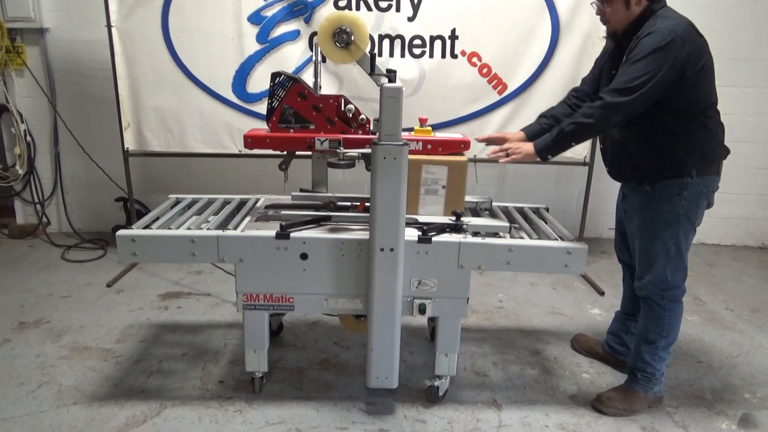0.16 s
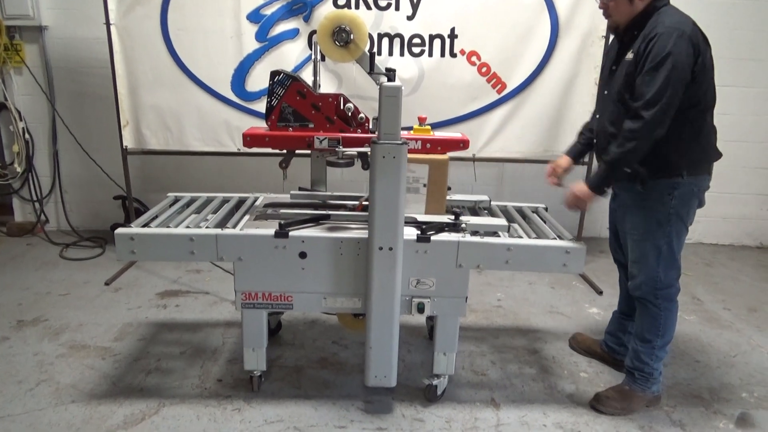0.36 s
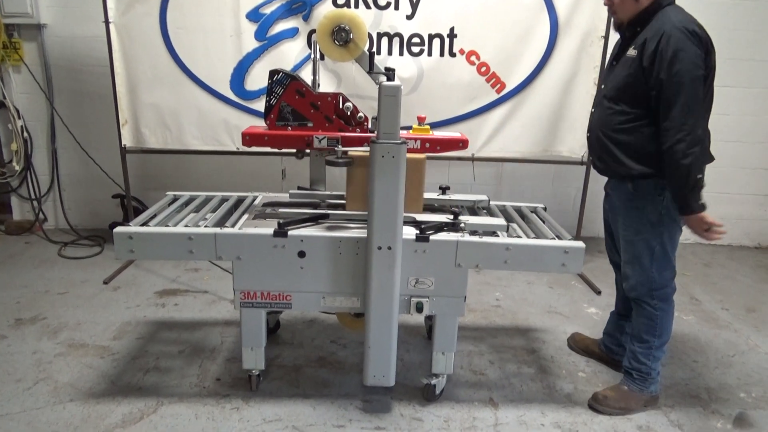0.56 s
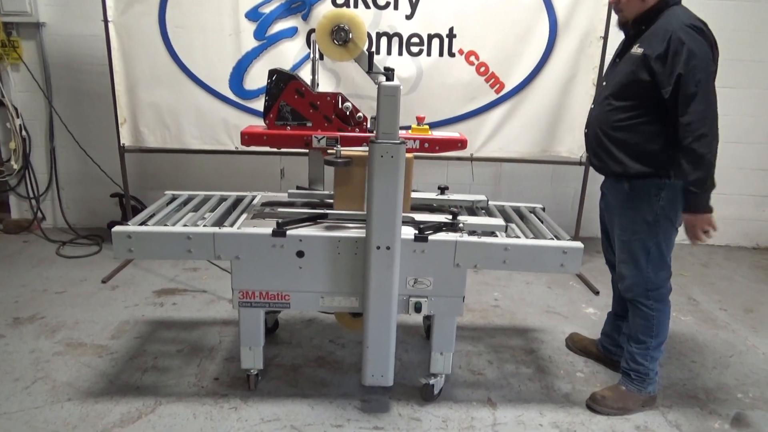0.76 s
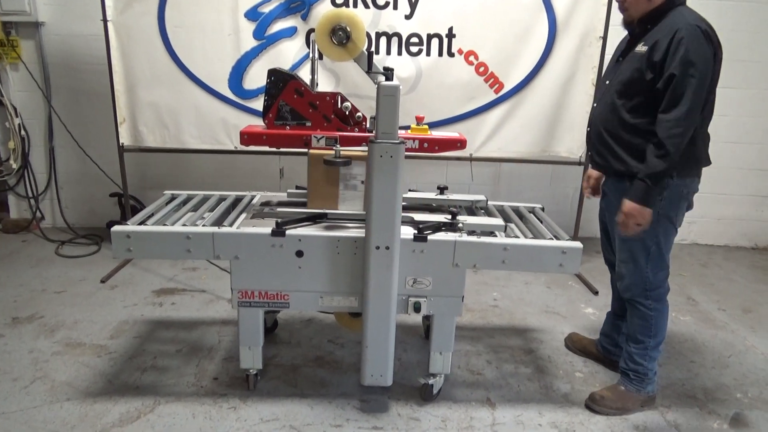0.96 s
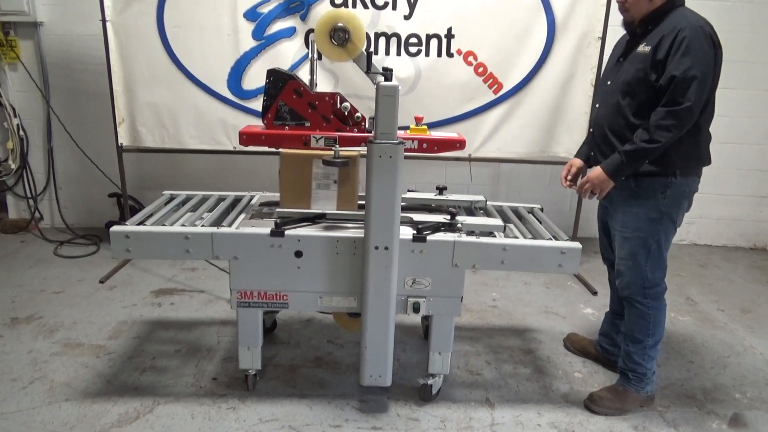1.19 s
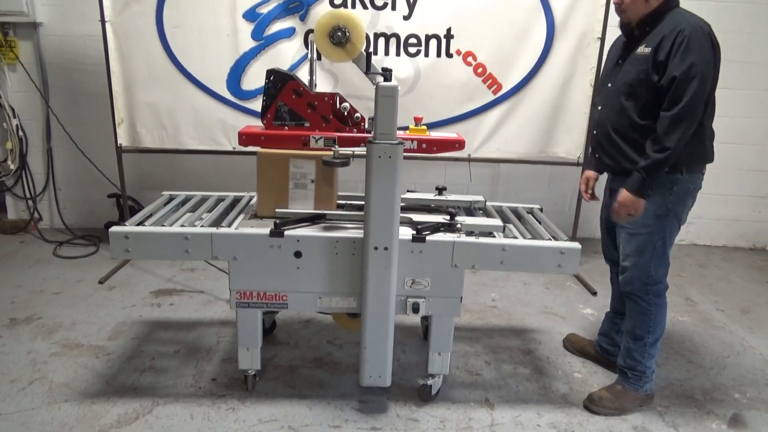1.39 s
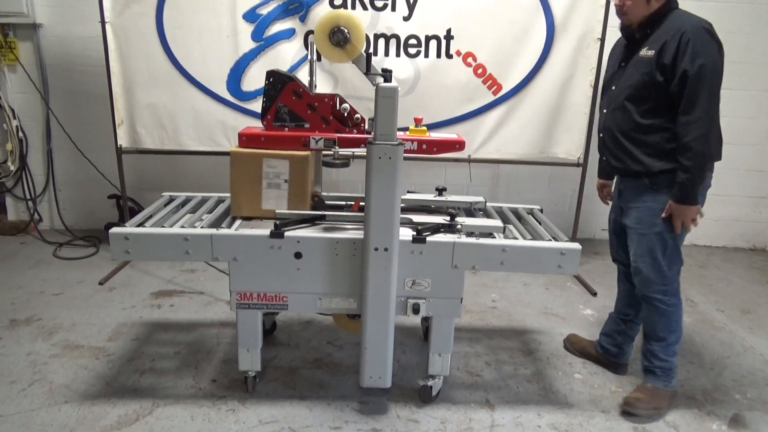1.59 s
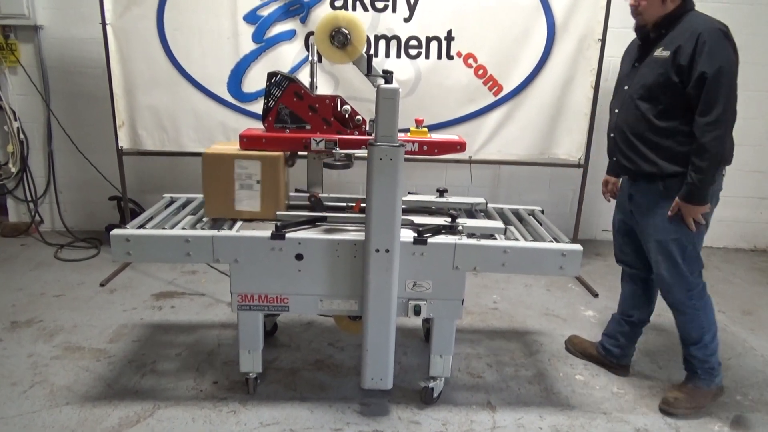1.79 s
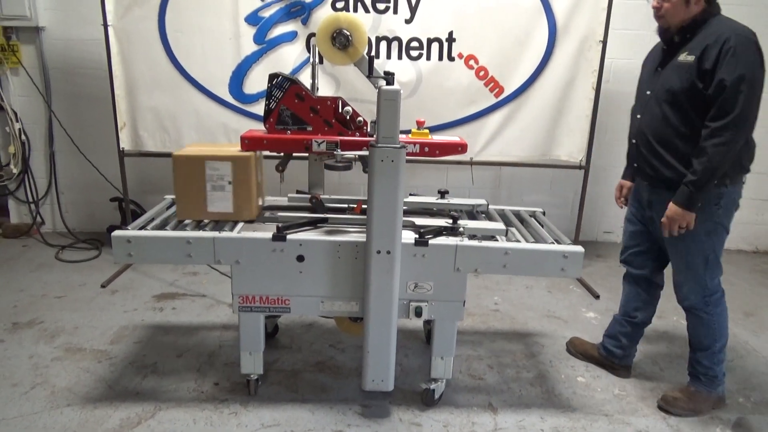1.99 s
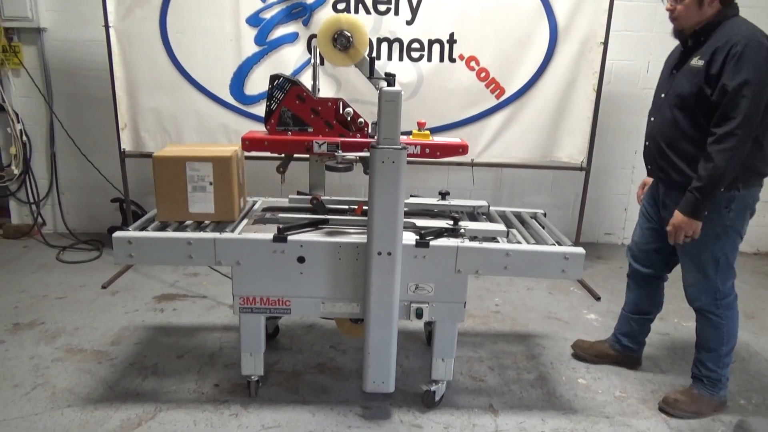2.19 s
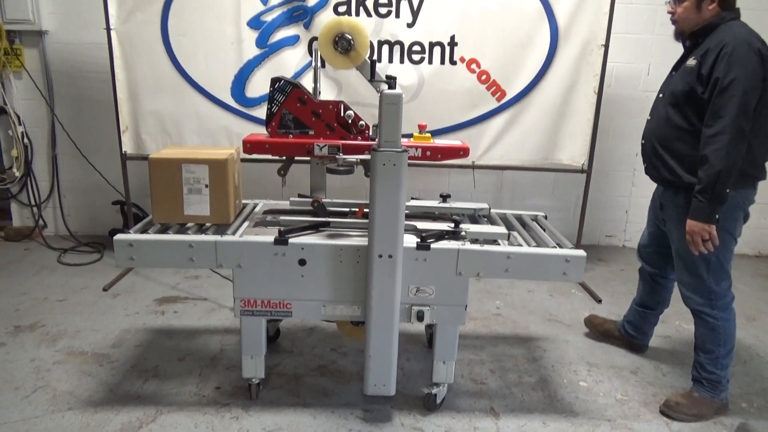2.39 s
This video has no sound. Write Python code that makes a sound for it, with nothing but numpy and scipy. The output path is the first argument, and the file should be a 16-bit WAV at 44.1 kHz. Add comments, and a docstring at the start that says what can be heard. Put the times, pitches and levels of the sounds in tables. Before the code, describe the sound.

A carton sealer tears tape along a box with crackling rip, metal clacks and steady motor noise

```python
"""A carton sealer in a hard-walled workshop, its belt motor and the air making steady noise throughout.
First a box bumps the taping head with a thud and a rattle, and metal parts clack and ring. Then tape rips
off the roll: dense random slips heard as sizzle and scrape, as drumming of the hollow box and as rumble.
Knocks on the box ring its resonances. Last the arms cut the tape and clack back, jingling, and the box
drops onto the rollers. A microphone a few metres away hears all this with the lively room's noise tails."""
import sys
import numpy as np
from scipy import signal
from scipy.fft import rfft, irfft
from scipy.io import wavfile
from scipy.ndimage import uniform_filter1d

SR = 44100
rng = np.random.default_rng(int(sys.argv[2]) if len(sys.argv) > 2 else 0)


def invert_db(x):
    """Field ratio 10**(x/20) for x, a level in decibels (scalar or array-like)."""
    u = np.asarray(x, float) / 20
    return 10 ** u


def generate_wav(sig):
    """Save sig (samples, or channels by samples) to the path in sys.argv[1] as 16-bit PCM at SR."""
    pcm = np.round(np.clip(np.atleast_2d(sig).T, -1, 1) * 32767).astype(np.int16)
    wavfile.write(sys.argv[1], SR, pcm)


N = 108045  # length of the scene in samples


def read(table, at, col=1, log=False):
    """Join a table column by straight lines: over log frequency, or over time with silence outside."""
    a = np.array(table, float)
    if log:
        return np.interp(np.log(at + 1), np.log(a[:, 0] + 1), a[:, col])
    return np.interp(at, a[:, 0], a[:, col], -120, -120)


def unit(x):
    """Scale to an rms (average strength) of 1."""
    return x / np.sqrt(np.mean(x ** 2))


def colour(x, table):
    """Filter the whole sound by a table of frequency in Hz and gain in dB."""
    hz = np.arange(N // 2 + 1) * SR / N
    return irfft(rfft(x) * invert_db(read(table, hz, log=True)), N)


def conv(a, b):
    """Convolve two sounds and cut the result to the scene's length."""
    return signal.fftconvolve(a, b)[:N]


def walk(rate):
    """Random levels, rate new ones per second, joined by slopes; rms 1."""
    k = int(SR / rate)
    held = np.repeat(rng.standard_normal(N // k + 1), k)
    return unit(uniform_filter1d(held, k)[:N])


def slips(rate, spread_db):
    """Dense tiny slips, rate per second on average, of random sign, a few much larger than the rest."""
    on, sign, draw = rng.random((3, N))
    draw = np.maximum(draw, .02)  # limits the largest slip
    size = invert_db(-spread_db * np.log(draw))
    return unit((on < rate / SR) * np.sign(sign - .5) * size)


def ring(hz, db, t60):
    """Half a second of a struck object: sines fading by 60 dB in t60 seconds, each with a chance phase."""
    t = np.arange(SR // 2)[:, None] / SR
    phase = 2 * np.pi * rng.random(len(hz))
    return (invert_db(db - 60 * t / t60) * np.sin(2 * np.pi * hz * t + phase)).sum(axis=1)


def favour(hz, best_hz, most_db):
    """Extra dB for the resonances nearest the one struck hardest."""
    octaves_away = np.log2(hz / best_hz)
    return most_db * np.exp(-(octaves_away / .08) ** 2)


def add(out, x, at_s):
    """Mix x in at a time in seconds."""
    i = int(at_s * SR)
    out[i:i + len(x)] += x[:N - i]


# Resonances of the hollow box.
# Each row: frequency in Hz, width in Hz, level in dB relative to the other rows.
BOX_MODES = [(561.1, 106.6, -1.5), (670, 99, 1), (745, 110, -0.5), (825, 32.8, -1), (974, 123, -7.5),
             (1138.4, 59, -17)]
# Tone of the box rumbling on the rollers. Each row: frequency in Hz, relative level in dB per Hz.
RUMBLE_TONE = [(60, -68.5), (129, -12), (170, -2.5), (225, -8), (277, 1.5), (340, -10), (420, -4.5),
               (500, -23.5), (1100, -60.5)]


def shaking(levels, tone, rate, spread_db):
    """Slips heard four ways: as sizzle, as scrape, through the hollow box, and as roller rumble."""
    t = np.arange(N) / SR
    flutter_db = 2 * walk(39.81)
    crackle = colour(slips(rate, spread_db), tone) * invert_db(flutter_db)
    split = signal.butter(2, 5525, fs=SR, output="sos")  # Hz
    scrape = signal.sosfiltfilt(split, crackle)
    sizzle = crackle - scrape

    push = slips(2500, 1.184) * invert_db(1.51 * walk(30.202))
    drumming = np.zeros(N)
    for hz, width_hz, db in BOX_MODES:
        resonance = signal.lfilter(*signal.iirpeak(hz, hz / width_hz, SR), push)
        drumming += resonance * invert_db(db + 3.8 * walk(14))
    rumble = colour(slips(3000, 1.57), RUMBLE_TONE) * invert_db(0.94 * walk(16))

    layers = (sizzle, scrape, drumming, rumble)
    return sum(unit(x) * invert_db(read(levels, t, col)) for col, x in enumerate(layers, 1))


# Tape pulled off the roll. Each row: time in seconds, sizzle of the glue in dB, scrape in dB,
# drumming of the box in dB, rumble of the box on the rollers in dB.
PULL_LEVELS = [(.29, -45.5, -43.5, -47, -46), (.311, -25.5, -35, -41.5, -40),
               (.389, -25.5, -27, -28, -33.5), (.431, -23, -25.5, -35, -40.5),
               (.495, -26, -32.5, -30.5, -35.5), (.517, -15.5, -24, -28.5, -31.5),
               (.541, -26, -24.5, -48, -41.5), (.595, -19, -31, -33.5, -45.5),
               (.609, -24, -24.5, -21.5, -52.5), (.655, -20.5, -29, -37.5, -41),
               (.675, -35, -29.5, -29, -35), (.785, -27.5, -39, -47.5, -64.5), (.803, -17, -26, -38.5, -58),
               (.84, -17, -24.5, -28, -48.5), (.963, -23, -27.5, -36, -47), (1.013, -22, -26, -29.5, -43.5),
               (1.059, -24, -32.5, -31.5, -43.5), (1.105, -19, -28.5, -29.5, -44.5),
               (1.3, -22.5, -25.5, -30, -47), (1.345, -24.5, -31.5, -33.5, -42),
               (1.385, -20.5, -25, -25.5, -43), (1.507, -23, -29, -34, -52), (1.555, -21.5, -27, -24, -46),
               (1.595, -28, -28, -37.5, -37.5), (1.668, -19.5, -29.5, -31, -51),
               (1.678, -17.5, -50.5, -62, -61.5), (1.691, -20.5, -21.5, -48, -59.5),
               (1.712, -25.5, -23, -26.5, -50.5), (1.783, -21.5, -25, -32.5, -49.5),
               (1.81, -32.5, -24.5, -27.5, -44), (1.879, -46.5, -37.5, -59, -44),
               (1.95, -47, -38.5, -43.5, -62)]
# Tone of the ripping tape. Each row: frequency in Hz, relative level in dB per Hz.
CRACKLE_TONE = [(530, -26.5), (900, -4), (1090, -5), (1190, -1.5), (1600, -1), (6400, -4.5), (9870, 2),
                (12900, -7), (15000, -12.5), (16200, -21.5)]


def tape_pull():
    """Tape tears loose from the roll in dense, uneven slips that also shake the box."""
    return shaking(PULL_LEVELS, CRACKLE_TONE, rate=9000, spread_db=3)


# Metal clacks of arms, rollers and blade.
# Each row: start in seconds, level of the chatter in dB, frequency in Hz of the resonance struck hardest.
CLACKS = [(0.1654, -32, 11500), (0.281, -28, 9000), (0.3087, -19.5, 9000), (0.3438, -21, 8250),
          (0.3715, -18.5, 8250), (0.402, -14, 8250), (0.659, -17.5, 3300), (1.424, -24.5, 3990),
          (1.686, -12, 8300), (1.779, -13.5, 8250), (1.9766, -12, 9050), (2.0089, -18.5, 9800),
          (2.0618, -22, 3300), (2.0902, -21, 9800)]
# Resonances of the taping head. Each row: frequency in Hz, level in dB before each clack's own mix.
HEAD_MODES = [(1900, -26), (2570, -20), (3300, -16), (3990, -29.5), (4510, -0.5), (5300, -16), (6000, -0.5),
              (6940, -1), (7440, -2), (8250, 0), (9000, -0.5), (9800, 4), (10570, -3), (11500, -10.5),
              (12450, -7)]


def clacks():
    """Each clack is a burst of chatter through the head's well-damped resonances in a new mix."""
    out, t = np.zeros(N), np.arange(SR // 8) / SR
    hz, mode_db = np.array(HEAD_MODES).T
    for start_s, db, best_hz in CLACKS:
        scatter_db = 2 * rng.standard_normal(len(hz))
        mix_db = mode_db + favour(hz, best_hz, most_db=4.5) + scatter_db
        body = ring(hz, mix_db, t60=.005)[:SR // 20]
        body[:2] += invert_db(-16) * np.sqrt(np.sum(body ** 2))  # lets some bare chatter through
        body = body / np.sqrt(np.sum(body ** 2))
        fade = invert_db(-60 * t / 0.1003)  # 60 dB in 0.1003 s
        rise = np.minimum(t / 0.00233, 1)  # seconds
        chatter = rng.standard_normal(len(t)) * fade * rise
        add(out, signal.fftconvolve(body, chatter) * invert_db(db), start_s)
    return out


# Springs and frame shaking as the arms snap home.
# Each row: time in seconds, jingle in dB, clatter in dB, drumming in dB, rumble in dB.
RETURN_LEVELS = [(1.976, -42, -48, -38, -52.5), (1.981, -26.5, -28.5, -29, -61),
                 (2.0, -24, -25, -26.5, -57), (2.04, -28, -28, -34.5, -46),
                 (2.07, -26.5, -30.5, -33, -42.5), (2.1, -30, -34, -40, -43.5),
                 (2.125, -48.5, -38.5, -56, -39), (2.2, -48.5, -40.5, -51, -50)]
# Tone of the jingling metal. Each row: frequency in Hz, relative level in dB per Hz.
JANGLE_TONE = [(530, -15), (900, -4), (2330, -3), (2530, -0.5), (5030, -4.5), (9400, 0), (16000, -21.5)]


def arms_return():
    """Springs and frame jingle and clatter in many small slips after the arms snap home."""
    return shaking(RETURN_LEVELS, JANGLE_TONE, rate=9000, spread_db=1.4)


# The box meets the head, later drops onto the rollers.
# Each row: start in seconds, thud in dB, rattle in dB, time for the rattle to rise in seconds.
BUMPS = [(0.0534, -23.5, -18, 0.01216), (2.038, -36.5, -27.5, 0.0089)]
# Resonances of the thud. Each row: frequency in Hz, relative level in dB, time to fade by 60 dB in seconds.
BUMP_MODES = [(189.7, -3.5, 0.124), (276.7, 1.5, 0.144), (301.3, 0.5, 0.196), (425.6, -8.5, 0.071),
              (518.6, -9.5, 0.097), (702, -13, 0.055)]
# Tone of the loose parts. Each row: frequency in Hz, relative level in dB per Hz.
RATTLE_TONE = [(180, -36.5), (400, -10), (650, -7.5), (1000, -12), (1700, -9.5), (3240, -12), (8490, -11.5),
               (12900, -19.5), (16000, -40.5)]


def bumps():
    """A cardboard thud of fading sines, with loose parts rattling up and dying."""
    out, t = np.zeros(N), np.arange(N) / SR
    noise = unit(colour(slips(9000, 1.28), RATTLE_TONE))
    soft_start = np.sin(np.pi / 2 * np.minimum(t[:SR // 2] / 0.0083, 1)) ** 2
    for start_s, thud_db, rattle_db, rise_s in BUMPS:
        thud = ring(*np.array(BUMP_MODES, float).T) * soft_start
        add(out, invert_db(thud_db) * thud, start_s)
        since = t - start_s
        rise = np.clip(since / rise_s, 0, 1) ** 2
        fade_db = -60 * np.maximum(since - rise_s, 0) / 0.1333  # 60 dB in 0.1333 s
        out += noise * invert_db(rattle_db + fade_db) * rise
    return out


# Rollers and flaps knocking on the box.
# Each row: start in seconds, level in dB, frequency in Hz of the resonance struck hardest.
KNOCKS = [(.603, -25, 825), (.635, -30.5, 825), (.668, -31.5, 825), (.705, -29, 825), (.842, -35, 670),
          (1.09, -28.5, 745), (1.521, -30.5, 670), (1.542, -35, 670), (1.712, -31.5, 670),
          (1.80, -28.5, 670), (1.985, -34, 670), (2.008, -31, 670), (2.082, -31.5, 670)]


def knocks():
    """Each knock rings the hollow box, the resonances nearest one frequency above the others."""
    out = np.zeros(N)
    hz, _, mode_db = np.array(BOX_MODES, float).T
    rise = np.minimum(np.arange(SR // 2) / (0.003 * SR), 1)  # over 3 ms
    for start_s, db, best_hz in KNOCKS:
        mix_db = mode_db + favour(hz, best_hz, most_db=9)
        add(out, invert_db(db) * rise * ring(hz, mix_db, t60=0.086), start_s)
    return out


# Single metal parts that ring out briefly.
# Each row: start in seconds, frequency in Hz, level in dB.
PINGS = [(.344, 4620, -24), (.344, 8016, -21), (.6595, 1900, -23), (1.4245, 2590, -18), (1.427, 4200, -24),
         (1.448, 2600, -20), (1.979, 3978, -18), (1.979, 2700, -25)]


def pings():
    """A part is shaken for a few ms on its own, slightly wavering pitch, then dies fast."""
    out, t = np.zeros(N), np.arange(SR // 10) / SR
    hold_s, t60_s = .007, .03
    shape = np.minimum(t / .0015, 1) * invert_db(-60 * np.maximum(t - hold_s, 0) / t60_s)
    for start_s, hz, db in PINGS:
        pitch = hz * (1 + .02 * walk(300)[:len(t)])
        add(out, invert_db(db) * shape * np.sin(2 * np.pi * np.cumsum(pitch) / SR), start_s)
    return out


# How strong the side (left-right difference) is against the mid (centre), before each source's own trim.
# Each row: frequency in Hz, side minus mid in dB.
SIDE_TONE = [(30, -8), (70, -22), (150, -33.5), (380, -17.5), (700, -14.5), (1290, -9.5), (2380, -10),
             (4400, -11), (8120, -12.5), (11000, -19), (15000, -21.5)]


def widen(x, trim_db):
    """Turn a sound into a side signal, whose share changes with frequency."""
    return colour(x, SIDE_TONE) * invert_db(trim_db)


# Tone of the belt motor and workshop air. Each row: frequency in Hz, relative level in dB per Hz.
MOTOR_TONE = [(25, -28), (60, -55), (110, -11.5), (180, -13), (290, -4), (400, -8.5), (620, -1.5),
              (1100, -3), (2500, -14.5), (10400, -15.5), (16000, -36)]


def motor():
    """Belt motor and workshop air: steady, slowly swelling noise; mid and side."""
    def noise():
        swell_db = 1.0 * walk(2.755)
        return unit(colour(rng.standard_normal(N), MOTOR_TONE)) * invert_db(-39 + swell_db)
    return noise(), widen(noise(), trim_db=-2.5)


# How long the room rings. Each row: frequency in Hz, time to fade by 60 dB in seconds.
ROOM_T60 = [(100, 0.55), (400, 0.686), (1500, 1.0), (5000, 0.7305), (10000, 0.487), (15000, 0.127)]


def room(x, count=6):
    """Diffuse noise tails, highest treble dying first; each spot on the machine has its own room path."""
    n = int(1.2 * SR)
    t, f = np.arange(n) / SR, np.arange(n // 2 + 1) * SR / n
    spec, tails = rfft(rng.standard_normal((count, n))), 0
    for hz in 50 * 2 ** np.arange(0, 8.6, .5):  # overlapping bands half an octave apart
        band = np.clip(1 - 2 * np.abs(np.log2((f + 1) / hz)), 0, 1)
        fade = invert_db(-60 * t / read(ROOM_T60, hz, log=True))
        tails = tails + irfft(spec * band, n) * fade
    first_echo_s, build_s = 0.00925, 0.00977
    tails = tails * np.clip((t - first_echo_s) / build_s, 0, 1) / np.sqrt(SR * 0.053)
    # the sound moves between the spots, 35 new random shares a second
    share = np.array([walk(35) for _ in range(count)])
    share = share / np.sqrt((share ** 2).sum(axis=0))
    return sum(conv(x * w, tail) for w, tail in zip(share, tails)) * invert_db(0.5)


def scene():
    """Machine straight ahead; the room and the motor noise spread a little to the sides."""
    dry = tape_pull() + clacks() + arms_return() + bumps() + knocks()
    ping = pings()
    # small parts beam their ring at the listener, little reaches the walls
    sent = dry + ping * invert_db(-10)
    hum, hum_side = motor()
    mid = dry + ping + room(sent) + hum
    side = widen(room(sent), trim_db=3.0) + hum_side
    return np.array([mid + side, mid - side])


def low_pass(x):
    """Removes everything above the highest recorded frequency."""
    return signal.sosfilt(signal.butter(12, 16120, fs=SR, output="sos"), x)


def record(dry):
    """The microphone rounds the highest peaks and cuts the deep bass."""
    soft_top = .8  # level the rounded peaks cannot pass
    rounded = soft_top * np.tanh(dry / soft_top)
    bass_cut = signal.butter(2, 120.5, "high", fs=SR, output="sos")  # Hz
    mix = signal.sosfilt(bass_cut, rounded)
    return low_pass(mix)


dry = scene()
out = record(dry)
generate_wav(out)
```